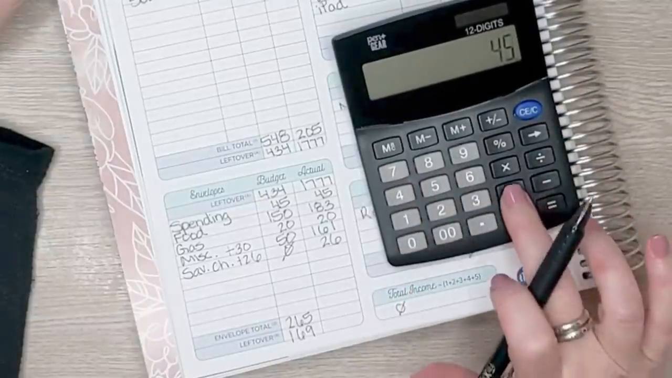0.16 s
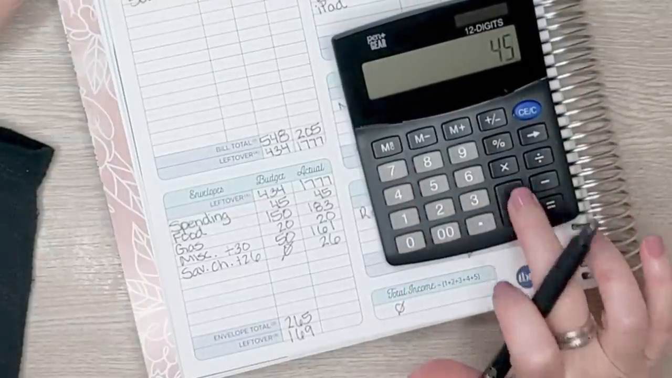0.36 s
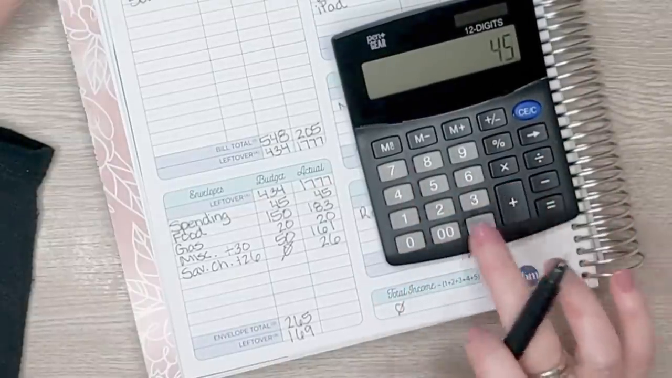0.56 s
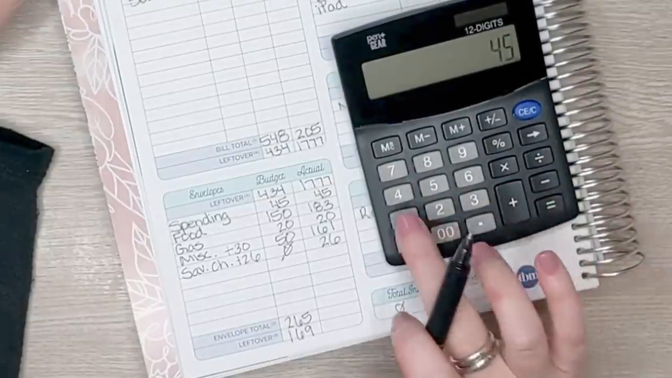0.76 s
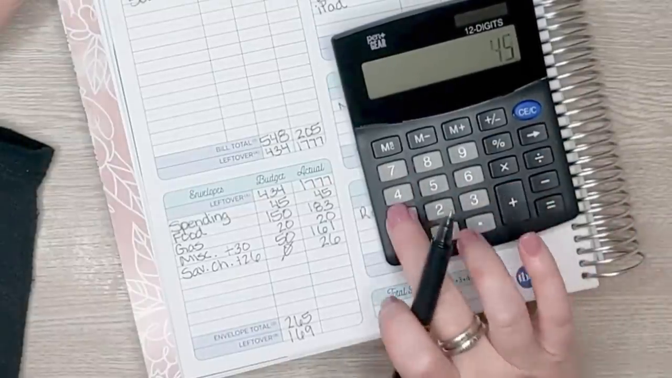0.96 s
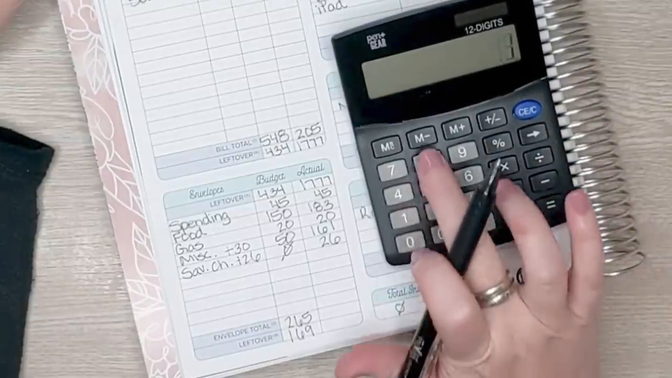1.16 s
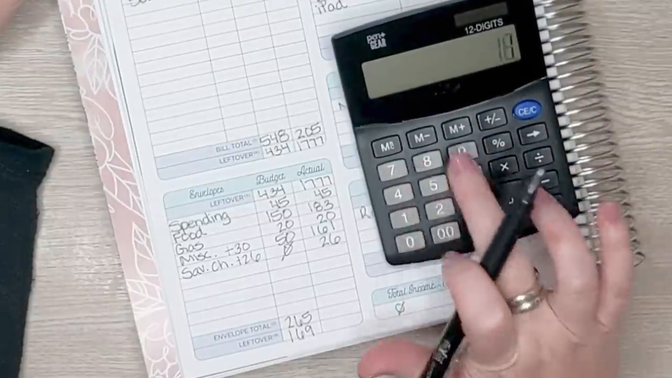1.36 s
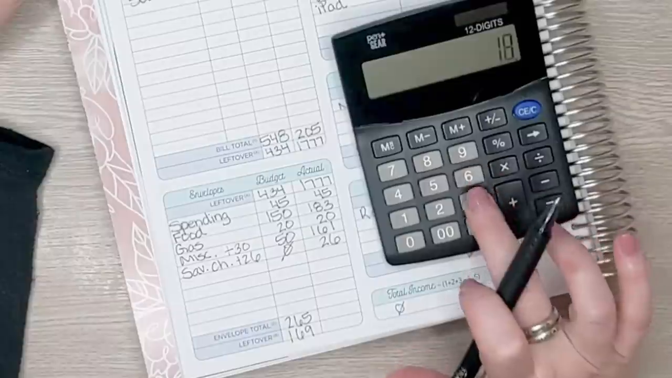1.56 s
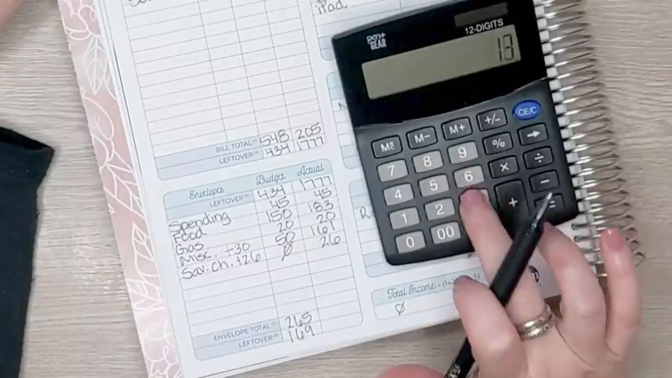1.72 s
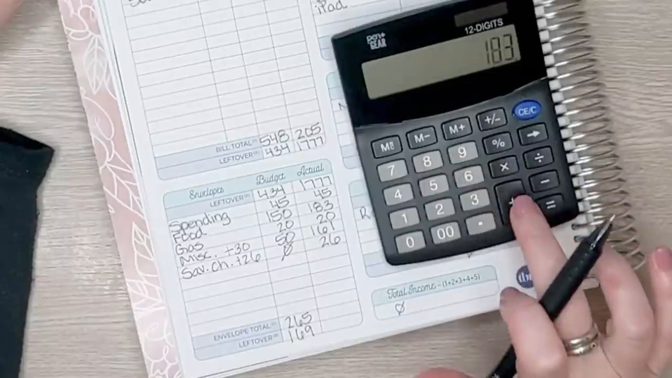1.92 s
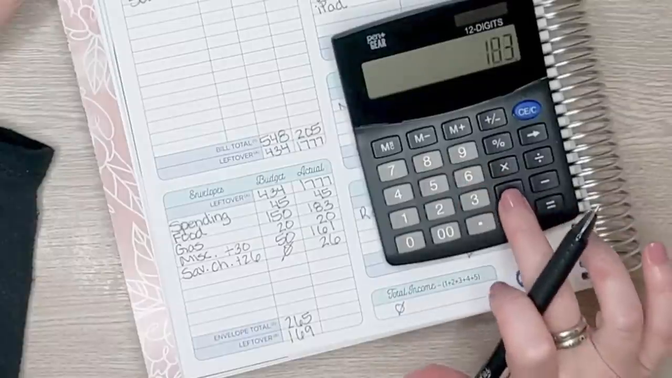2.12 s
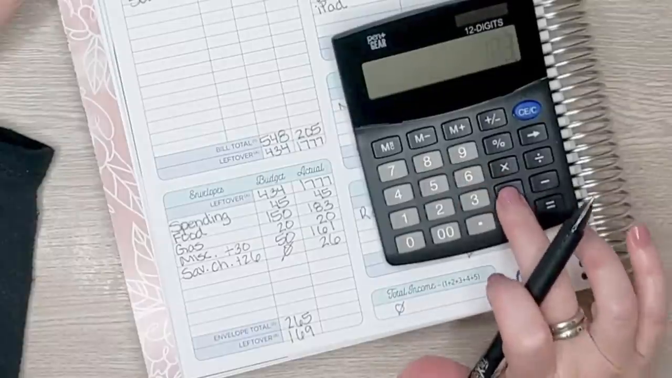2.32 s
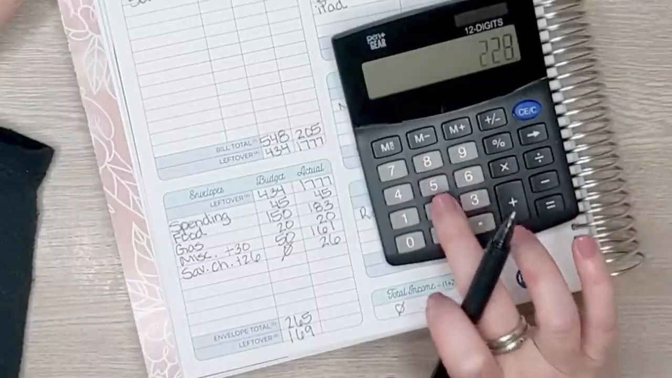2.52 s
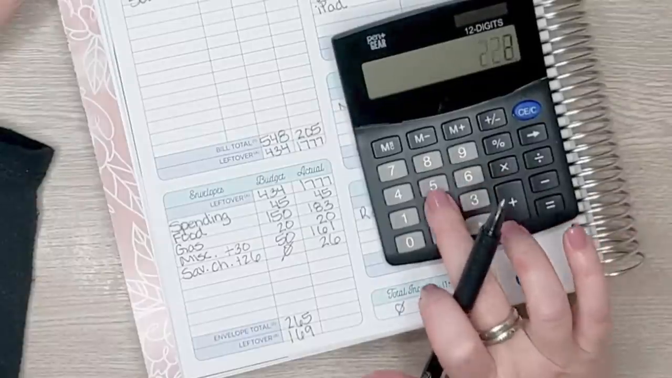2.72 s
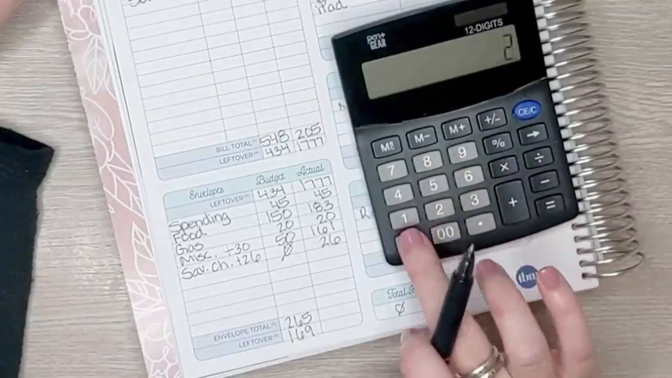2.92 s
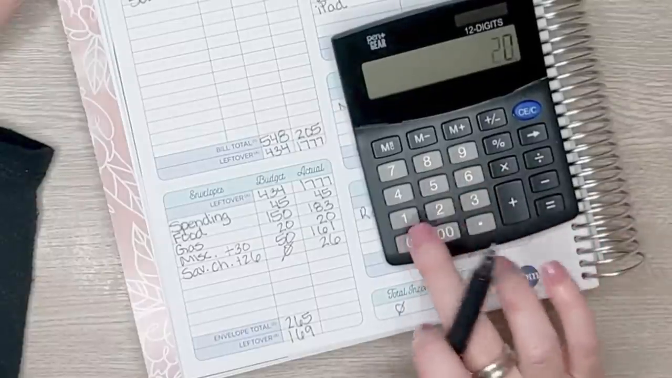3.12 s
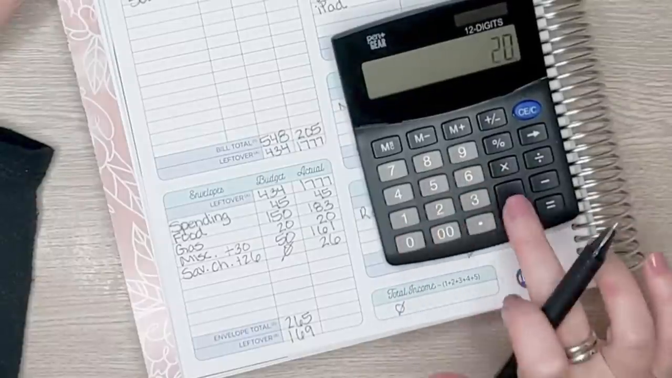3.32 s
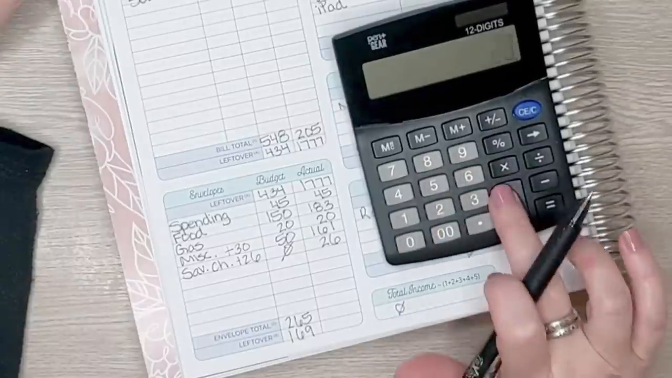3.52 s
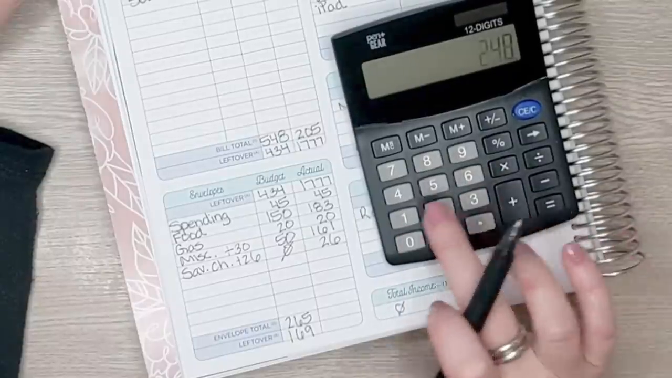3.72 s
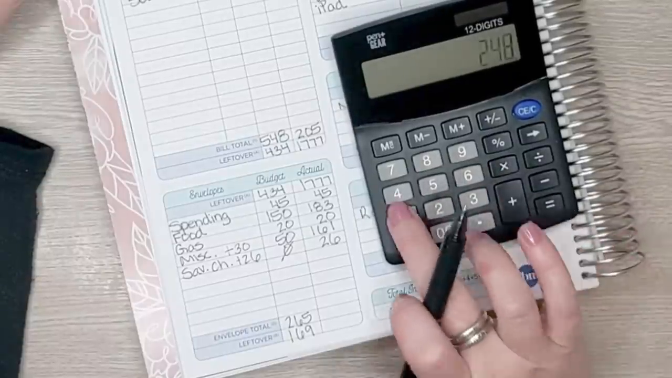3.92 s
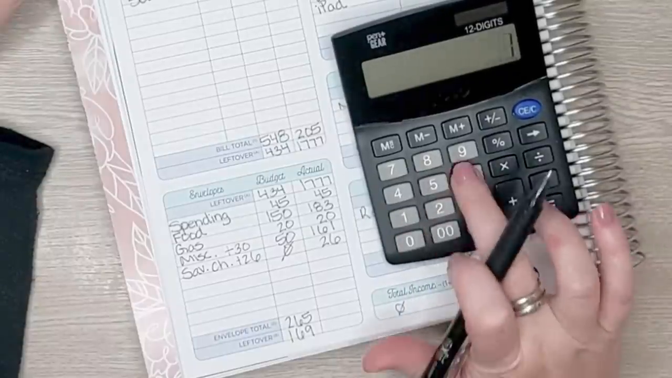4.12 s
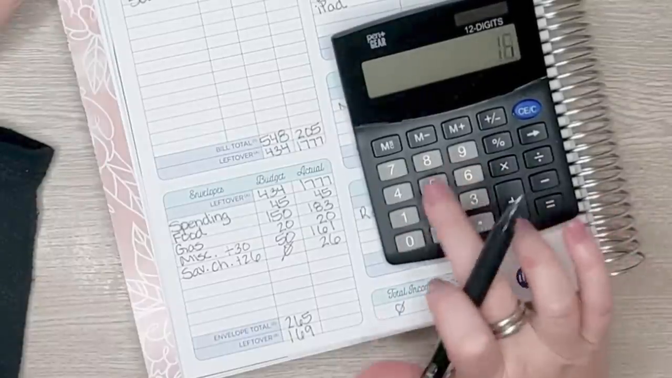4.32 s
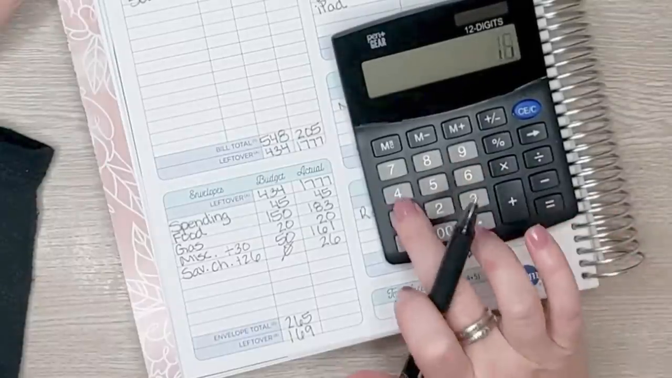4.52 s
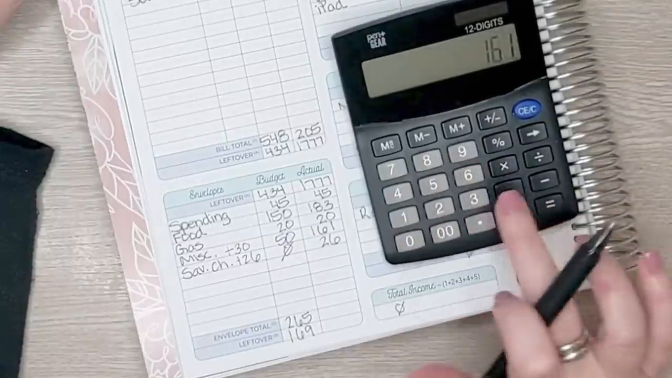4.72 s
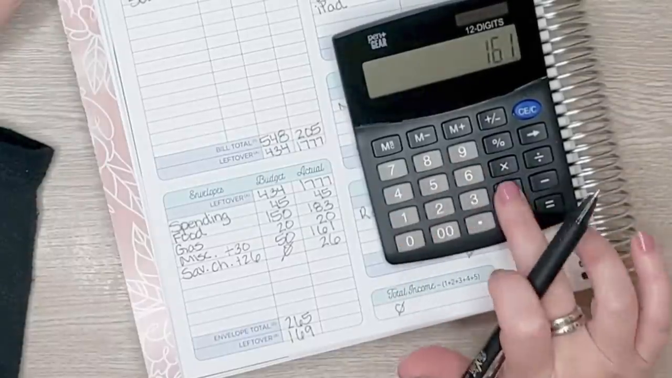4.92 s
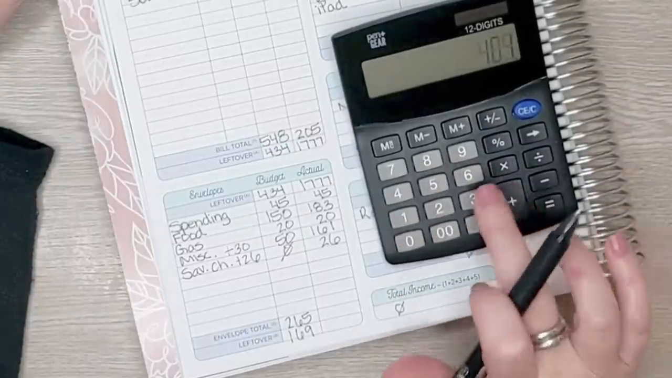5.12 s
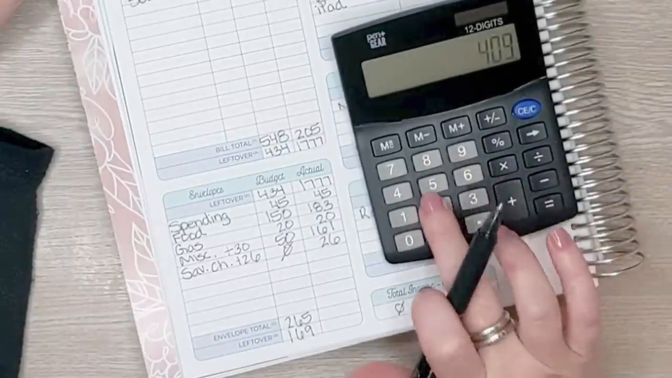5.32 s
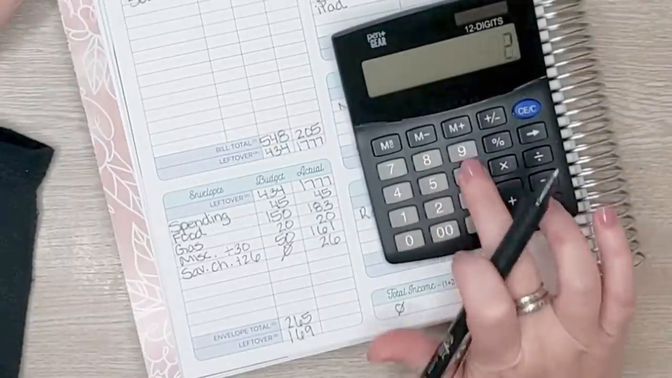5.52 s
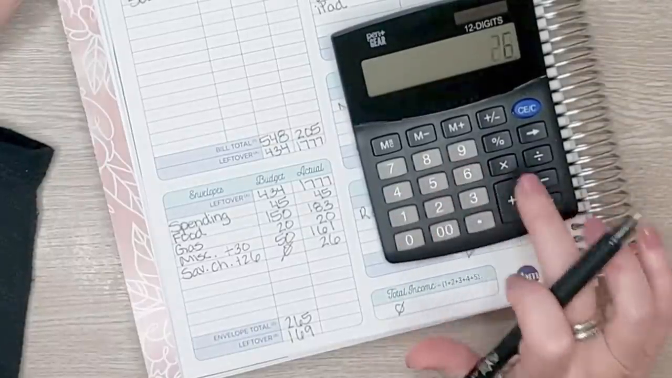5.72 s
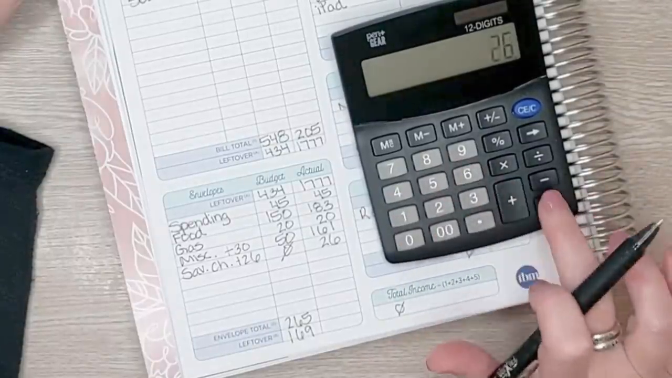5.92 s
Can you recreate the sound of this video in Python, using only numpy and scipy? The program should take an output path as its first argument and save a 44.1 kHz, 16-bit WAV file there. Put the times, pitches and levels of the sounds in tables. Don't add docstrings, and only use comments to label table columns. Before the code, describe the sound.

Fourteen or so calculator key presses, each a dry double click with a soft desk thump, over faint hiss and rumble.

```python
import sys
import numpy as np
from scipy import signal
from scipy.fft import rfft, irfft
from scipy.io import wavfile
from scipy.ndimage import uniform_filter1d

SR = 44100
rng = np.random.default_rng(int(sys.argv[2]) if len(sys.argv) > 2 else 0)


def attenuation_scalar(level_db):
    decades = np.asarray(level_db, float) / 20
    return 10 ** decades


def to_wav(sig):
    pcm = np.clip(np.atleast_2d(sig), -1, 1) * 32767
    pcm = np.round(pcm).astype(np.int16)
    wavfile.write(sys.argv[1], SR, pcm.T)


N = 267290

PRESSED_CAP_HZ = 1330


def with_light_case(rows):
    return [(s, cap_db, cap_hz, cap_db - 8, 894, tick_db) for s, cap_db, cap_hz, tick_db in rows]


def grazes(strokes, early_s, under_db, force_share):
    usual_db = -33
    rows = []
    for s, cap_db, cap_hz, case_db, case_hz, tick_db in strokes:
        change_db = under_db - (1 - force_share) * (cap_db - usual_db)
        rows.append((s - early_s, cap_db + change_db, cap_hz, case_db + change_db, case_hz, tick_db + change_db))
    return rows


# start_s, cap_db, cap_hz, tick_db
NAIL_TAPS = [(0.3199, -19.5, 2700, -48), (1.0087, -38.5, 3020, -43), (1.3117, -48, 1600, -54),
             (1.7372, -41.5, 2100, -63), (2.3177, -34, 1620, -44), (2.7362, -41.5, 1410, -60),
             (3.0616, -38, 2000, -42.5), (3.5717, -29, 3330, -32.5), (4.2559, -31.5, 1590, -34.5),
             (4.5523, -30, 1250, -34.5), (5.0378, -29, 2180, -39), (5.3805, -34.5, 1580, -40.5),
             (5.6372, -30, 1500, -31.5)]


def taps():
    return with_light_case(NAIL_TAPS)


# start_s, cap_db, case_db, case_hz, tick_db
KEY_BOTTOMS = [(0.3215, -25, -20.5, 930, -32.5), (1.0107, -36, -31.5, 1010, -35.5),
               (1.318, -32, -25.5, 1034, -47), (1.7432, -40, -34.5, 1100, -64),
               (2.3222, -31, -24.5, 840, -49), (2.741, -29, -33, 1140, -32.5),
               (3.0653, -37.5, -39, 940, -52), (3.5778, -37.5, -38, 1150, -35),
               (3.9781, -31.5, -33.5, 1030, -36.5), (4.2656, -38.5, -56, 1120, -57),
               (4.5567, -21.5, -25, 1020, -33), (5.0402, -25, -23, 743, -36),
               (5.6404, -31, -27.5, 835, -57)]


def bottoms():
    return [(s, cap_db, PRESSED_CAP_HZ, case_db, case_hz, tick_db)
            for s, cap_db, case_db, case_hz, tick_db in KEY_BOTTOMS]


# start_s, cap_db, cap_hz, case_db, tick_db
KEY_RELEASES = [(0.4491, -22.5, 1540, -28.5, -26.5), (1.1078, -34, 2170, -60, -39),
                (1.4116, -31, 2250, -39, -29), (1.8509, -34.5, 2420, -38, -36.5),
                (2.4447, -25, 3050, -29, -22), (2.8737, -35.5, 3140, -37.5, -42),
                (3.2104, -35.5, 2180, -42, -34), (3.7275, -38, 1470, -36.5, -48.5),
                (4.0899, -26, 3390, -40.5, -31.5), (4.3618, -35, 1450, -40, -39.5),
                (4.667, -30.5, 3500, -48, -33.5), (5.1758, -26.5, 2120, -47, -22),
                (5.494, -37.5, 1580, -45, -45), (5.739, -34.5, 1160, -33, -47)]


def releases():
    return [(s, cap_db, cap_hz, case_db, 820, tick_db)
            for s, cap_db, cap_hz, case_db, tick_db in KEY_RELEASES]


# start_s, cap_db, cap_hz, tick_db
FURTHER_CAP_CONTACTS = [(0.4518, -55, 1180, -32), (1.1112, -39, 1280, -47), (1.7236, -35.5, 2230, -35.5),
                        (1.84, -39.5, 2730, -45), (2.328, -45, 2110, -43.5), (2.4172, -47.5, 1110, -67),
                        (2.8821, -43, 3290, -64), (3.218, -32.5, 3400, -34), (3.7343, -42, 1390, -59),
                        (4.6693, -33.5, 1820, -35.5), (5.0456, -32.5, 1300, -50), (5.182, -24, 3180, -20.5),
                        (5.1841, -26, 2270, -34), (5.2362, -44, 2790, -42), (5.4867, -40.5, 3650, -49),
                        (5.7485, -40, 2680, -62), (1.104, -33.5, 3770, -43), (1.3475, -48, 3500, -44.5),
                        (5.0305, -40, 1810, -46), (2.446, -43, 2580, -34), (4.092, -34.5, 1630, -39),
                        (5.6341, -31.5, 2630, -30)]


def further_contacts():
    return with_light_case(FURTHER_CAP_CONTACTS)


# start_s, case_db, case_hz
CASE_ROCKS = [(0.3288, -24, 590), (1.0178, -34.5, 513), (1.323, -31, 780), (1.3457, -46, 800),
              (3.077, -31, 516), (3.5857, -39.5, 514), (3.986, -34, 510), (3.9995, -43, 546),
              (4.2559, -31, 820), (4.2745, -54, 850), (4.565, -30, 890), (5.0378, -32.5, 560),
              (5.3906, -36.5, 472), (5.6312, -34.5, 880), (1.4056, -38.5, 500), (2.4452, -34.5, 530),
              (3.2105, -34, 463), (3.579, -36, 393), (3.729, -41, 560), (4.559, -29, 590),
              (2.329, -34, 760)]


def settles():
    return [(s, case_db - 10, PRESSED_CAP_HZ, case_db, case_hz, case_db - 49)
            for s, case_db, case_hz in CASE_ROCKS]


def contacts():
    down, up = taps(), releases()
    hard = down + up
    hard += grazes(down, early_s=0.003, under_db=-10.5, force_share=0.41)
    hard += grazes(up, early_s=0.003, under_db=-15.5, force_share=0.24)
    hard += further_contacts()
    return hard, bottoms() + settles()


RING_T = np.arange(2048) / SR


def ring(modes, chance, blur=1, focus_db=0, t=RING_T):
    hz, db, t60 = np.transpose(modes)[:, :, None]
    spot, detune, port, skew = chance[:4 * len(modes)].reshape(4, -1, 1)
    overtone = hz != hz[0]
    size = attenuation_scalar(db - focus_db * np.abs(np.log2(hz / hz[0])))
    turn = 2 * np.pi * hz * (1 + 0.025 * detune * overtone)
    near = size * attenuation_scalar(2.5 * spot * overtone - 60 * t / t60)
    port_db, lag_s = 1.5 * port, 2e-5
    left = near * attenuation_scalar(port_db) * np.sin(turn * np.maximum(t - lag_s * (1 + skew), 0))
    right = near * attenuation_scalar(-port_db) * np.sin(turn * np.maximum(t - lag_s, 0))
    sign = (-1) ** np.arange(len(modes))[:, None]
    walls = size * sign * attenuation_scalar(-60 * t / (blur * t60)) * np.sin(turn * t)
    return np.array([left.sum(0), right.sum(0), walls.sum(0)])


def rattle(rings, spread_s, chance, peak_db):
    when, size = chance[-32:].reshape(2, 16)
    touch_s = 0.001 + np.maximum(when, 0.55 * when) * spread_s
    index = np.clip(touch_s * SR, 0, 599).astype(int)
    touches = np.zeros(600)
    np.add.at(touches, index, size * attenuation_scalar(-4 * np.abs(when)))
    touches[44] += 2.4
    near = signal.fftconvolve(rings[:2], touches[None], axes=1)[:, :len(RING_T)]
    peak_power = uniform_filter1d((near ** 2).mean(0), size=70).max()
    near *= attenuation_scalar(peak_db) / np.sqrt(2 * peak_power)
    walls = rings[2] * near.std() / rings[2].std()
    return np.vstack([near, walls])


def add(track, sound, s):
    i = int(s * SR)
    part = sound[:, :N - i]
    track[:, i:i + part.shape[1]] += part


# pitch_hz, level_db, t60_s
CASE_MODES = [(487, 0.5, 0.017), (590, -7.5, 0.056), (742, -16.5, 0.083), (845, -11.5, 0.082),
              (960, -9.5, 0.046)]
KEYPAD_MODES = [(1328, -3.5, 0.016), (1695, 2.5, 0.006), (2350, 7, 0.0039), (2890, 9, 0.0064),
                (3500, 3.5, 0.0099), (4160, -26, 0.0064)]
SHELL_MODES = [(4370, -14, 0.0018), (5840, 1.5, 0.0037), (6145, 0, 0.0037), (7080, 1, 0.0021),
               (7840, -8, 0.0025), (9050, -9.5, 0.0018), (10340, -7.5, 0.0016), (12200, -5, 0.0011)]
SPREAD_S, PART_DB = (0.0014, 0.001153, 0.0022), (1, -5.5, -2)
BLUR = (0.11, 0.59, 0.32)
FOCUS_DB = (5.5, 10, -2)
PART_LOW_HZ = (780, 350, 3020)
CUSHION_DB = 4


def keys():
    parts = np.zeros((3, 3, N))
    hard, soft = contacts()
    rows = hard + soft
    cushions = [0] * len(hard) + [CUSHION_DB] * len(soft)
    chances = rng.standard_normal((len(rows), 3, 64))
    for row, cushion_db, chance in zip(rows, cushions, chances):
        s, cap_db, cap_hz, case_db, case_hz, tick_db = row
        cap = [(cap_hz, 0, 0.014)] + KEYPAD_MODES
        case = [(case_hz, 0, 0.021)] + CASE_MODES
        focus_db = (FOCUS_DB[0] + cushion_db, FOCUS_DB[1], FOCUS_DB[2])
        struck = zip((cap, case, SHELL_MODES), (cap_db, case_db, tick_db))
        for k, (modes, db) in enumerate(struck):
            rings = ring(modes, chance[k], BLUR[k], focus_db[k])
            sound = rattle(rings, SPREAD_S[k], chance[k], db + PART_DB[k])
            add(parts[k], sound, s - 0.0006)
    mix = 0
    for low_hz, part in zip(PART_LOW_HZ, parts):
        highpass = signal.butter(3, low_hz, "high", fs=SR, output="sos")
        mix = mix + signal.sosfilt(highpass, part)
    return mix


# pitch_hz, level_db, t60_s
DESK_MODES = [(108.3, 3, 0.24), (133, -1.5, 0.071)]
# start_s, level_db
DESK_THUMPS = [(0.322, -48.5), (1.013, -45), (1.324, -46.5), (1.742, -59), (2.324, -51), (2.74, -48),
               (3.066, -47), (3.576, -48.5), (3.984, -46), (4.257, -54), (4.558, -40.5), (5.034, -52),
               (5.383, -47.5), (5.643, -61)]


def desk():
    out, t = np.zeros((2, N)), np.arange(SR // 2) / SR
    swell = 1 - np.exp(-t / 0.0056)
    chances = rng.standard_normal((len(DESK_THUMPS), 8))
    for (s, db), chance in zip(DESK_THUMPS, chances):
        boom = ring(DESK_MODES, chance / 3, t=t)[:2]
        add(out, attenuation_scalar(db) * boom * swell, s)
    return out


def across(table, hz):
    f, v = np.transpose(table)
    return np.interp(np.log(hz + 1), np.log(f + 1), v)


def shape(x, gain):
    n = x.shape[-1]
    return irfft(rfft(x) * gain(np.arange(n // 2 + 1) * SR / n), n)


# pitch_hz, likeness (0-1)
PORT_LIKENESS = [(60, 0.92), (130, 0.8), (290, 0.53), (640, 0.38), (1410, 0), (3100, 0.02), (6820, 0),
                 (15000, 0)]


def pair(n):
    mid, side = rng.standard_normal((2, n))
    mid = shape(mid, lambda hz: np.sqrt(1 + np.clip(across(PORT_LIKENESS, hz), 0, 1)))
    side = shape(side, lambda hz: np.sqrt(1 - np.clip(across(PORT_LIKENESS, hz), 0, 1)))
    return np.array([mid + side, mid - side]) / 2


# pitch_hz, t60_s, level_db
ROOM_BANDS = [(148, 1, 12.5), (424, 0.18, 0), (892, 0.46, -5), (1920, 0.36, -9.5), (4280, 0.39, -9),
              (10000, 0.34, -5)]
# start_s, level_db
NEAR_ECHOES = [
    (.0088, -18.5),
    (0.0115, -21.5),
    (0.022, -37),
]


def room(dry):
    t = np.arange(SR // 2) / SR
    noise, tail = pair(len(t)), 0
    build = 1 - np.exp(-(t / 0.005) ** 2)
    for hz, t60, db in ROOM_BANDS:
        band = shape(noise, lambda f: np.exp(-np.log2((f + 1) / hz) ** 2 / 0.71))
        tail = tail + band * attenuation_scalar(db - 60 * t / t60) * build / np.sqrt(0.015 * SR)
    scatter = pair(len(t)) * attenuation_scalar(8 - 60 * t / 0.027) * (t > 0.0015)
    tail = tail + scatter / np.sqrt(0.018 * SR)
    for (s, db), skew in zip(NEAR_ECHOES, rng.standard_normal(len(NEAR_ECHOES))):
        tail[0, int(s * SR)] += attenuation_scalar(db)
        tail[1, int(s * SR + 6 * skew)] += attenuation_scalar(db)
    return signal.fftconvolve(dry, tail, axes=1)[:, :N]


# pitch_hz, density_db (per Hz)
AIR_COLOUR = [(15, -36), (25, -31), (49, 5), (76, 0), (217, -10.5), (263, -12), (326, -12.5), (427, -16),
              (677, -15), (911, -19), (1130, -17.5), (3430, -26.5), (7110, -29.5), (14800, -40.5),
              (16000, -40)]
# pitch_hz, width_hz, level_db
MOTOR_HUM = [(114.5, 9.3, -70), (220.7, 3.4, -74), (339.7, 10.2, -73.5)]


def quiet():
    air = shape(pair(N), lambda hz: attenuation_scalar(across(AIR_COLOUR, hz)))
    out = air * attenuation_scalar(-58.5) / air.std()
    for hz, width, db in MOTOR_HUM:
        tone = shape(pair(N), lambda f: 1 / (1 + ((f - hz) / width * 2) ** 2))
        out += tone * attenuation_scalar(db) / tone.std()
    return out


def scene():
    left, right, walls = keys()
    direct = np.array([np.roll(left, 5), right])
    return direct + room(walls[None]) + desk() + quiet()


def band_limit(x):
    return signal.sosfilt(signal.butter(12, 16510, fs=SR, output="sos"), x)


# pitch_hz, left_minus_right_db
PORT_COLOUR = [(60, .3), (250, -.8), (900, 1.5), (2400, -1.5), (5000, .4), (12000, .5)]


def record(dry):
    def edges(hz):
        low, high = (32 / (hz + 1)) ** 4, (hz / 15900) ** 150
        return 1 / np.sqrt((1 + low) * (1 + high))

    left = shape(dry[0], lambda hz: edges(hz) * attenuation_scalar(across(PORT_COLOUR, hz) / 2))
    right = shape(dry[1], lambda hz: edges(hz) * attenuation_scalar(-across(PORT_COLOUR, hz) / 2))
    return band_limit(np.array([left, right]))


dry = scene()
out = record(dry)
to_wav(out)
```